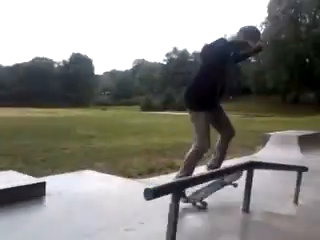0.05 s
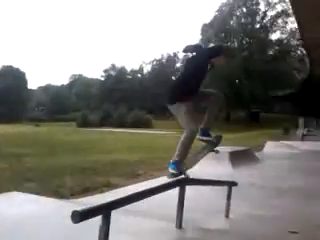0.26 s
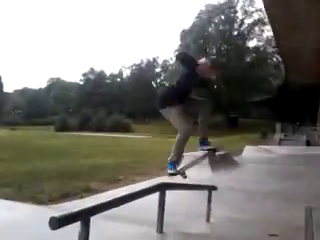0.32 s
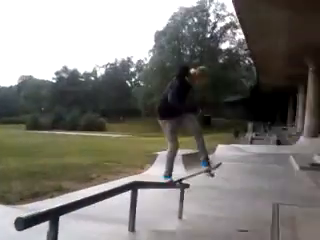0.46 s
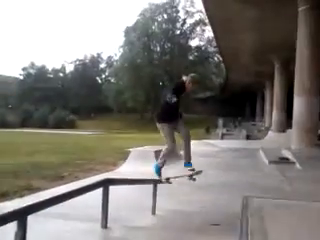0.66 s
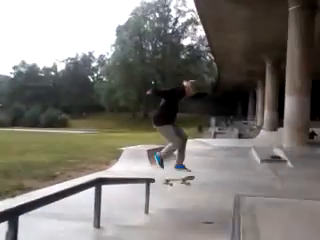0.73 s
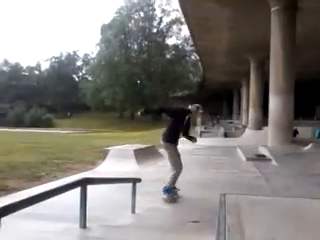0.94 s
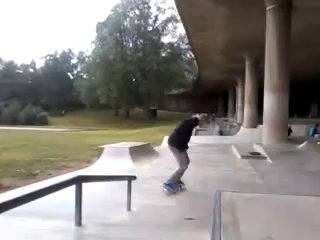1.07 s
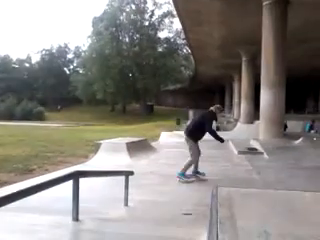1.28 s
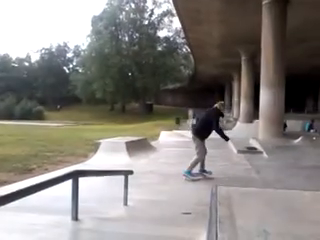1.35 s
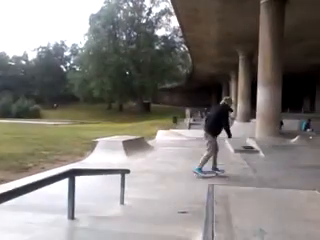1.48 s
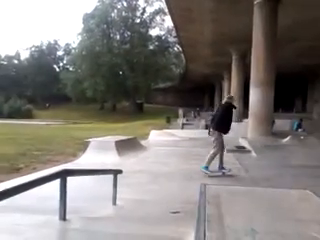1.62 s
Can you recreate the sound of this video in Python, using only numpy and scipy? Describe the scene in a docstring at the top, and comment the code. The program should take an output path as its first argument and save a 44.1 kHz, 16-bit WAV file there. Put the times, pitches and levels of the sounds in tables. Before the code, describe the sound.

A skateboard pops, clacks on a metal rail, slams onto concrete and rolls away.

```python
"""A skateboard rolls up on concrete, pops into the air, clacks onto a steel rail and scrapes off it.
The rail rings on while the board flies; the board slams down in two blows and rolls away.
Each hit is a burst of noise plus the ring of the wooden deck. Rubber parts squeak, and a concrete
overpass echoes. Air buffets the microphone, and a dull-sounding recorder clips every big hit."""
import sys
import numpy as np
from scipy import signal
from scipy.fft import rfft, irfft, next_fast_len
from scipy.io import wavfile
from scipy.ndimage import uniform_filter1d, map_coordinates

SR = 44100
rng = np.random.default_rng(int(sys.argv[2]) if len(sys.argv) > 2 else 0)


def int16_out(signal):
    """Quantize to a 16-bit WAV file."""
    q = np.round(np.clip(np.atleast_2d(signal).T, -1, 1) * 32767)
    wavfile.write(sys.argv[1], SR, q.astype(np.int16))


N = 74970

# A fade time (t60) is how long a sound takes to drop 60 dB. More tilt means a brighter sound.
# hits of the tail and trucks (axles) (time [s], level [dB], fade time [s], tilt [dB/octave])
CLACK_HITS = [(0.045, -19, 0.018, -6), (0.2305, -4, 0.078, 1), (0.237, -4, .045, 1.5),
              (0.2715, -17.5, .05, -4), (0.279, -13.5, 0.028, -3.5), (0.289, -11, 0.028, 1),
              (0.314, -18, .04, 1), (0.437, -12, .035, -5), (0.472, -19.5, 0.14, -4),
              (0.534, -4.5, .1, 3.5), (0.543, -3.5, 0.053, -3.5), (0.553, -0.5, .08, 11),
              (0.571, -13.5, 0.031, 3), (0.586, -1, 0.097, 1.5), (0.644, -14, 0.034, 3),
              (1.019, -3.5, 0.035, 0), (1.302, -21, .09, 1.5)]
# tone colour of a clack's noise (frequency [Hz], level [dB])
CRACK_COLOUR = [(50, -22), (180, -2), (400, -4), (800, -8.5), (1300, -1), (1750, -6.5), (2300, 4.5),
                (3000, -2), (4000, -4.5)]
# notes of the maple deck (frequency [Hz], level [dB], fade time [s])
DECK_NOTES = [(191, -21, .1), (535, -21, 0.24), (735, -19.5, 0.095), (1142, -19.5, 0.075),
              (1975.5, -8, 0.074), (2283, -3.5, 0.038), (2554, -19, .07), (2670, -24.5, 0.042)]
# wheels hitting the ground and its joints (time [s], level [dB], fade time [s], tilt [dB/octave])
SLAM_HITS = [(1.0115, -5.5, .12, 3), (1.018, -7.5, 0.062, 1.5), (1.024, -2.5, 0.12, 6.5),
             (1.067, -4.5, 0.067, 1), (1.074, 0, .1, 0.5), (1.084, 0.5, 0.068, -4.5),
             (1.097, -3.5, 0.082, -6), (1.173, -14, 0.11, -5.5), (1.211, -9.5, 0.075, 1),
             (1.296, -23.5, 0.3, -2.5), (1.374, -16.5, 0.025, -0.5), (1.395, -19.5, 0.056, -2.5),
             (1.479, -22.5, .03, 0.5), (1.499, -26.5, 0.025, -2.5)]
# tone colour of a slam's noise (frequency [Hz], level [dB])
THUD_COLOUR = [(30, -18.5), (100, -20.5), (280, -12), (500, 0.5), (850, 0.5), (1150, 1.5), (1450, 2.5),
               (1700, 3), (2000, -13.5), (3000, -11.5), (4000, -11.5)]
# notes of the board pressed down by the rider (frequency [Hz], level [dB], fade time [s])
LOADED_NOTES = [(503.4, -18.5, .45), (597.5, -22, 0.52), (743.7, -20.5, 0.33), (792, -16, .16),
                (953, -18, 0.31), (1161, -13, 0.11), (1374, -22.5, 0.079), (1433, -12.5, 0.15)]
# resonances of truck and rail touching (frequency [Hz], width [Hz], level [dB])
CONTACT_PEAKS = [(366, 150, -13.5), (922, 120, -2.5), (1315, 190, -4.5), (1686, 150, 4), (2020, 100, -3.5),
                 (2537, 95, -5), (3140, 120, -15.5)]
# notes of the steel rail (frequency [Hz], level [dB], fade time [s], extra ring under the truck [dB])
RAIL_NOTES = [(229, -29, 12, -12), (356, -30, 3.2, 4), (683, -23.5, 1.1, -1), (816, -24, .28, 16.5),
              (943, -23.5, 1.6, 13.5), (1313, -19, .6, 8.5), (1414, -33.5, 0.86, 8.5), (1596, -29, 1.22, 1),
              (1600, -20.5, 1.4, 5.5), (1677, -24.5, 3.2, -0.5), (1683, -22, 2.6, 8.5),
              (2000, -23, 1.4, -4), (2250, -34, 1.3, 0), (2520, -31.5, 1.2, 9)]
# squeaks of truck cushions and shoe soles (time [s], length [s], pitch [Hz], level [dB])
RUBBER_SQUEAKS = [(0.057, 0.033, 693, -29), (0.103, 0.031, 595, -24.5), (0.317, 0.021, 1340, -20.5),
                  (0.459, 0.017, 742.5, -17), (0.463, .024, 862, -23.5), (0.504, 0.03, 557.6, -20)]
# loudness of the wheels on concrete (time [s], level [dB])
WHEEL_LEVELS = [(0.015, -78), (0.028, -33.5), (0.12, -29.5), (0.22, -28), (0.3, -30), (0.42, -29.5),
                (0.52, -26), (0.62, -24.5), (1.05, -31), (1.13, -23.5), (1.32, -23.5), (1.45, -28),
                (1.7, -30.5)]
# tone colour of the wheels before tilting (frequency [Hz], level [dB])
WHEEL_COLOUR = [(60, -28), (200, 2), (400, 4.5), (650, 7.5), (1000, -1), (1600, 0.5), (2200, -4),
                (3200, -14.5), (4000, -15.5)]
# how long the overpass echoes (frequency [Hz], fade time [s])
ECHO_FADES = [(100, 0.84), (500, 1.73), (1500, 1.45), (3500, 1.02)]
# loudness of the air on the microphone (time [s], level [dB])
AIR_LEVELS = [(0.02, -70), (0.045, -29), (0.08, -43.5), (0.19, -35), (0.27, -28.5), (0.32, -42.5),
              (0.38, -29.5), (0.5, -36.5), (0.7, -35), (0.82, -32), (0.89, -22.5), (0.99, -26.5),
              (1.15, -42), (1.3, -31.5), (1.45, -36), (1.56, -28.5), (1.7, -36.5)]
# tone colour of that air (frequency [Hz], level [dB])
AIR_COLOUR = [(20, -29), (45, -17), (75, -6), (120, -1.5), (200, -7), (350, -12), (800, -41.5), (2000, -76)]
# brief drops in level after the hardest hits (time [s], length [s], level change [dB])
LEVEL_DIPS = [(0.564, .004, -33), (1.028, 0.01, -21.5), (1.04, .006, -5.5), (1.044, 0.0044, -25),
              (1.053, .008, -19.5)]
# how well the microphone hears each frequency (frequency [Hz], gain [dB])
MIC_RESPONSE = [(20, -10), (60, 1.5), (3000, -0.5), (3400, -4), (3800, -15.5), (4200, -25.5), (4600, -60.5),
                (5200, -110)]

HIT_RISE_S = 0.0015
GRIND_START_S, GRIND_RISE_S, GRIND_HOLD_S, GRIND_FADE_S, GRIND_DB = 0.575, 0.011, 0.034, 0.21, -8
RAIL_RISE_S, RAIL_RELEASE_S = 0.021, 0.24  # the release is the fade time of the extra ring
SQUEAK_ROUGH_DB, GRIT_DB, AIR_LUMPS_DB = 3, 2, 1  # size of the random shakes in level
ECHO_DELAY_S = 0.02
CLIP_LIMIT, CLIP_HARDNESS, TOP_HZ = 0.71, 22, 16000


def clacks():
    """The tail and trucks hit hard: each hit cracks and rings the deck."""
    return strikes(CLACK_HITS, CRACK_COLOUR, DECK_NOTES, ring_db=-3)


def slams():
    """The board lands; under the rider's weight it sounds lower and fuller."""
    return strikes(SLAM_HITS, THUD_COLOUR, LOADED_NOTES, ring_db=-1)


def strikes(hits, colour, notes, ring_db):
    """Each hit makes a burst of noise and sets the board's notes ringing afresh."""
    out = np.zeros(N)
    for start, db, t60, tilt_db in hits:
        t = clock() - start
        ring = sum(amp(level) * blow(t, life) * np.sin(2 * np.pi * (hz * t + rng.random()))
                   for hz, level, life in notes)
        burst = blow(t, t60) * noise(colour, tilt_db)
        out += amp(db) * (burst + amp(ring_db) * ring)
    return out


def grind():
    """The truck scrapes briefly along the rail: noise coloured by the metal's resonances."""
    def resonances(hz):  # neighbouring peaks take opposite signs
        return sum((-1) ** k * amp(db) * 1j * hz * width / (peak ** 2 - hz ** 2 + 1j * hz * width)
                   for k, (peak, width, db) in enumerate(CONTACT_PEAKS))
    t = clock() - GRIND_START_S
    stroke = np.clip(t / GRIND_RISE_S, 0, 1) * fade(t - GRIND_HOLD_S, GRIND_FADE_S)
    scrape = unit(filtered(rng.standard_normal(N), resonances))
    return amp(GRIND_DB) * stroke * scrape


def rail():
    """The scrape shakes the steel rail hard; then it rings on alone."""
    t = clock() - GRIND_START_S
    pressed = fade(t - GRIND_HOLD_S, RAIL_RELEASE_S)
    ring = sum(amp(db) * (1 + amp(extra_db) * pressed) * fade(t, t60) * tone(hz, waver=0.08, rate=60)
               for hz, db, t60, extra_db in RAIL_NOTES)
    return np.clip(t / RAIL_RISE_S, 0, 1) * ring


def squeaks():
    """Rubber slips unevenly, making short, rough tones."""
    slips = np.zeros(N)
    for start, length, hz, db in RUBBER_SQUEAKS:
        swell = np.sin(np.pi * np.clip((clock() - start) / length, 0, 1))
        slips += np.sqrt(2) * amp(db) * swell * tone(hz, waver=0.71, rate=160)
    return slips * amp(SQUEAK_ROUGH_DB * wobble(rate=350))


def wheels():
    """The wheels roar, shaken by the rough ground, and grow duller as they leave."""
    away = clock() / clock()[-1]
    bright = noise(WHEEL_COLOUR, tilt_db=2)
    dull = noise(WHEEL_COLOUR, tilt_db=0.85)
    roar = np.sqrt(1 - away) * bright + np.sqrt(away) * dull
    grit = amp(GRIT_DB * wobble(rate=170))
    return amp(curve(WHEEL_LEVELS)) * unit(roar * grit)


def overpass(x):
    """The concrete roof sends sound back late; each frequency fades at its own speed."""
    hz, t, bands = signal.stft(rng.standard_normal(N), SR, nperseg=256)
    decay = np.exp(-np.log(1000) * t / along(ECHO_FADES, hz)[:, None])
    tail = signal.istft(bands * decay, SR, nperseg=256)[1][:N]
    tail *= np.clip(clock() / ECHO_DELAY_S - 1, 0, 1)
    return signal.fftconvolve(x, tail / np.linalg.norm(tail))[:N]


def air():
    """Air makes a low, lumpy rumble as the microphone swings after the rider."""
    return amp(curve(AIR_LEVELS) + AIR_LUMPS_DB * wobble(rate=20)) * noise(AIR_COLOUR)


def amp(db):
    """Turn decibels into a multiplier."""
    return 10 ** (np.asarray(db) / 20)


def unit(x):
    """Scale x to an average power of 1."""
    return x / np.sqrt(np.mean(x ** 2) + 1e-20)


def clock():
    """The time of every sample, in seconds."""
    return np.arange(N) / SR


def along(points, hz):
    """Read between (frequency, value) points, on a log frequency scale."""
    frequencies, values = np.transpose(points)
    return np.interp(np.log(hz + 1), np.log(frequencies + 1), values)


def curve(points):
    """Join (time, value) points with straight lines."""
    return np.interp(clock(), *np.transpose(points))


def wobble(rate):
    """A smooth curve through `rate` random values a second."""
    return map_coordinates(rng.standard_normal(2048), [clock() * rate + 2], mode="wrap")


def filtered(x, response):
    """Multiply each frequency in x by response(hz)."""
    size = next_fast_len(N + SR // 2)
    return irfft(rfft(x, size) * response(np.fft.rfftfreq(size, 1 / SR)), size)[:N]


def noise(colour, tilt_db=0):
    """Noise of a given tone colour, tilted by tilt_db per octave above the bass."""
    def response(hz):
        octaves = np.log2(np.clip(hz, 300, 4000) / 1000)
        return amp(along(colour, hz) + tilt_db * octaves) * (hz < SR / 10)
    return unit(filtered(rng.standard_normal(N), response))


def fade(t, t60):
    """Full level until t = 0, then 60 dB quieter every t60 seconds."""
    return np.exp(-np.log(1000) * np.maximum(t, 0) / t60)


def blow(t, t60):
    """A sudden start at t = 0, then a fade."""
    return np.clip(t / HIT_RISE_S, 0, 1) * fade(t, t60)


def tone(hz, waver, rate):
    """A pure tone whose phase wanders by about `waver` radians."""
    return np.sin(2 * np.pi * (hz * clock() + rng.random()) + waver * wobble(rate))


def scene():
    """Mix the board and its echo with the rail, wheels and air."""
    sources = [(clacks(), -12.5), (grind(), -9.5), (slams(), -10.5), (squeaks(), -15)]
    board = sum(sound + amp(echo_db) * overpass(sound) for sound, echo_db in sources)
    return (board + rail() + wheels() + air())[None]


def record(dry):
    """The level dips at set times, the microphone loses the treble and loud peaks are flattened."""
    t = clock()
    dip_db = sum(db * ((t > start) & (t < start + length)) for start, length, db in LEVEL_DIPS)
    dipped = dry[0] * amp(uniform_filter1d(dip_db, size=80))
    dulled = filtered(dipped, lambda hz: amp(along(MIC_RESPONSE, hz)))
    clipped = dulled / (1 + np.abs(dulled / CLIP_LIMIT) ** CLIP_HARDNESS) ** (1 / CLIP_HARDNESS)
    low_pass = signal.ellip(10, 0.05, 80, TOP_HZ, fs=SR, output="sos")
    return signal.sosfilt(low_pass, clipped)[None]


dry = scene()
out = record(dry)
int16_out(out)
```